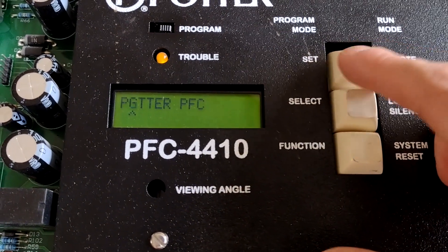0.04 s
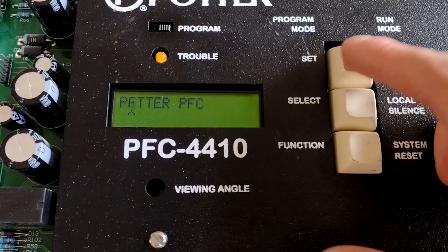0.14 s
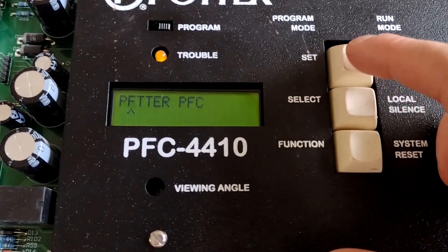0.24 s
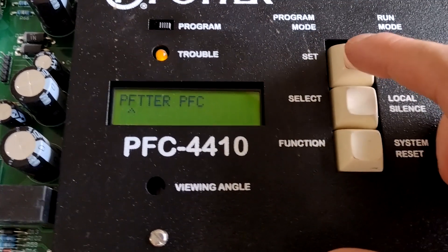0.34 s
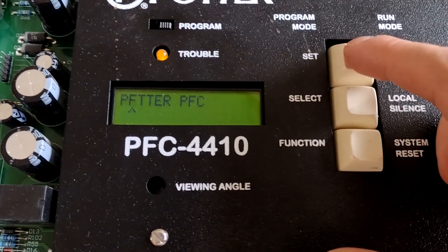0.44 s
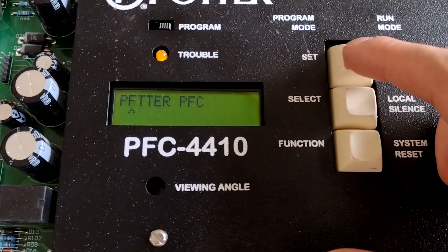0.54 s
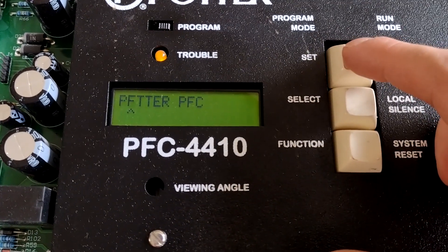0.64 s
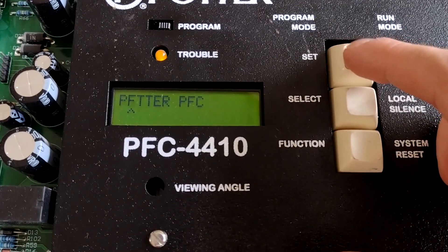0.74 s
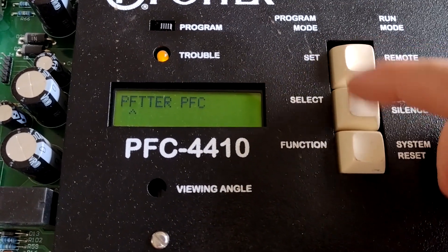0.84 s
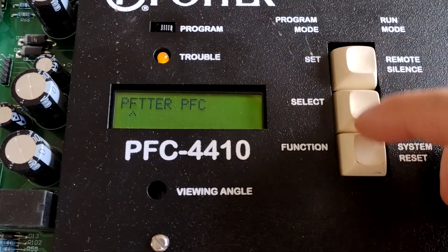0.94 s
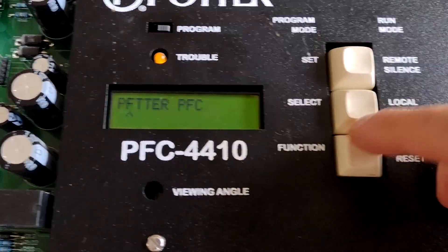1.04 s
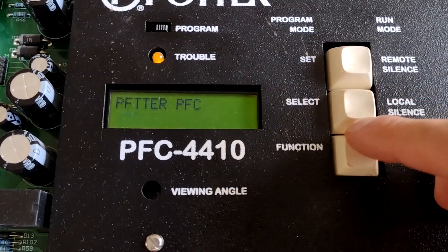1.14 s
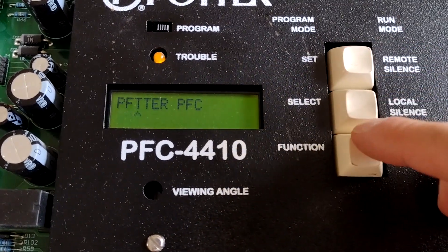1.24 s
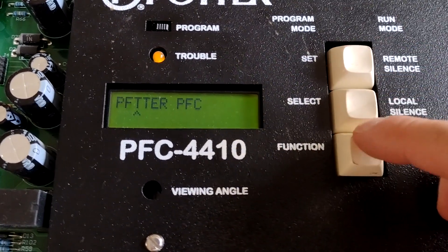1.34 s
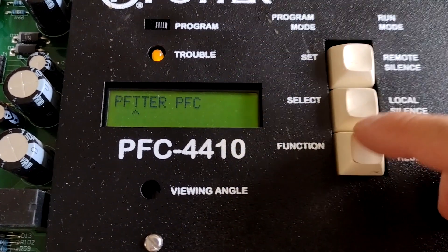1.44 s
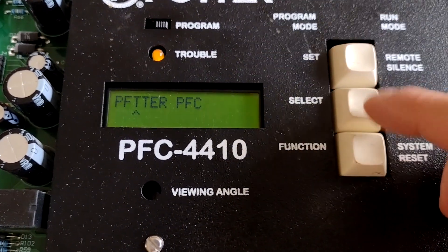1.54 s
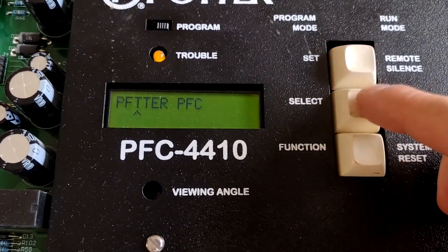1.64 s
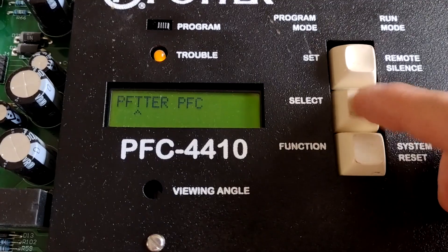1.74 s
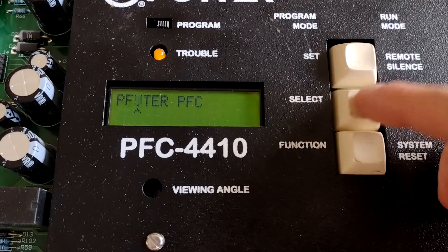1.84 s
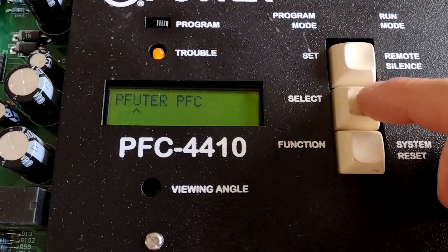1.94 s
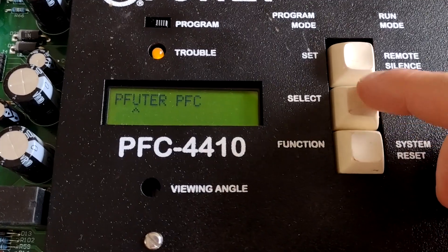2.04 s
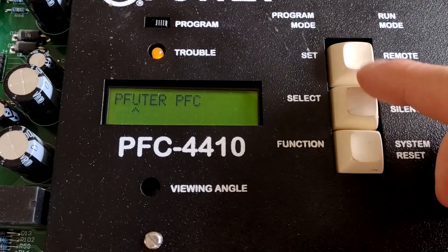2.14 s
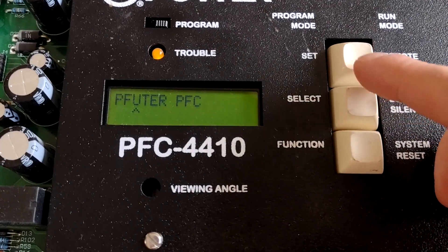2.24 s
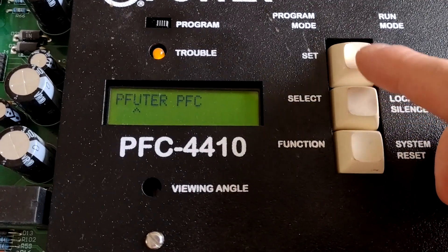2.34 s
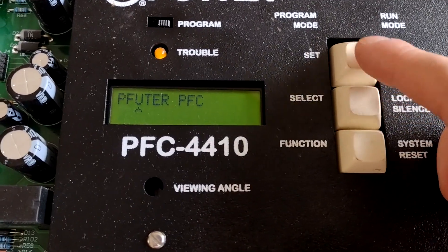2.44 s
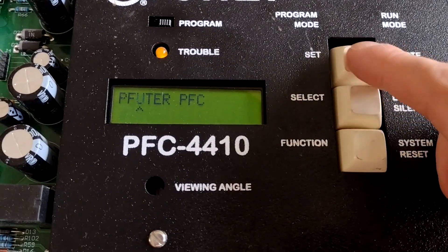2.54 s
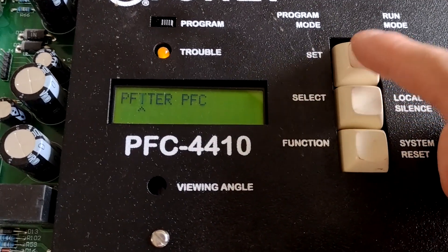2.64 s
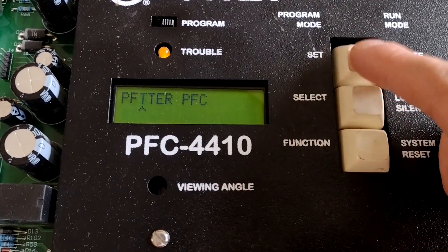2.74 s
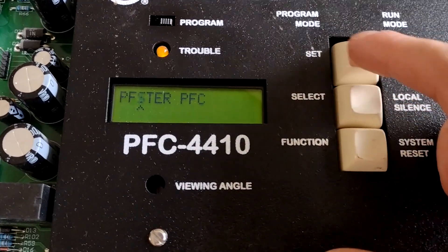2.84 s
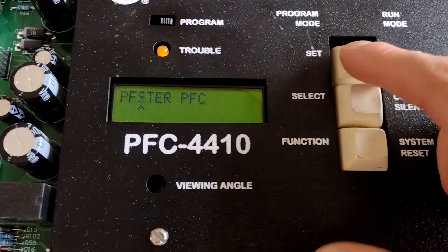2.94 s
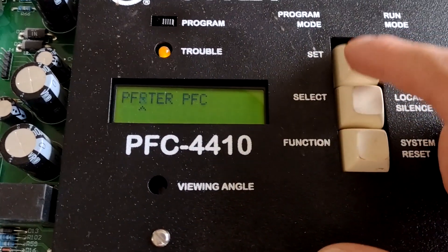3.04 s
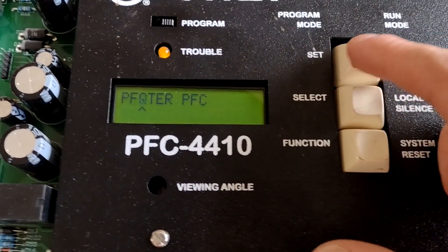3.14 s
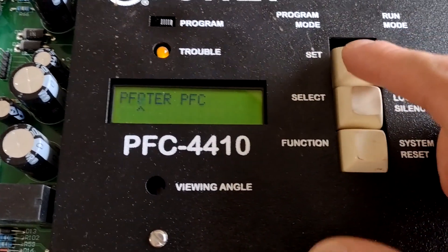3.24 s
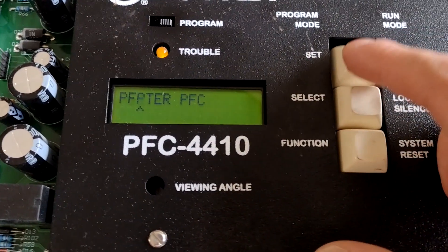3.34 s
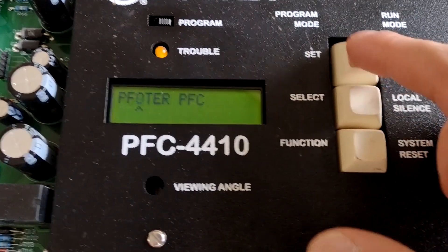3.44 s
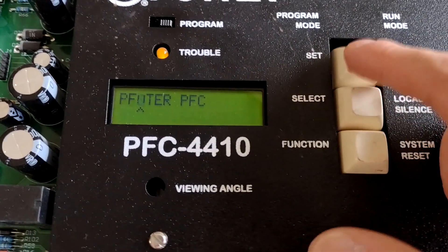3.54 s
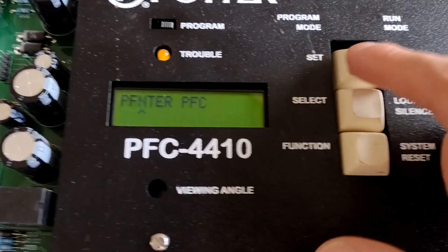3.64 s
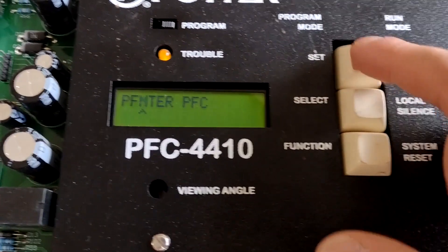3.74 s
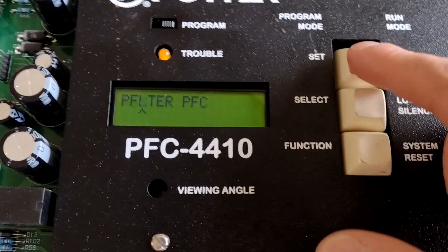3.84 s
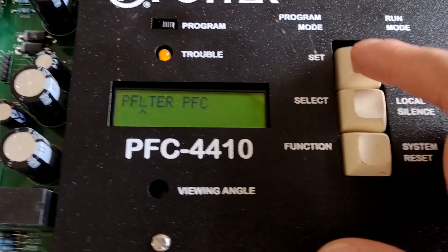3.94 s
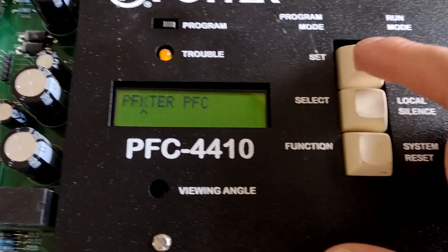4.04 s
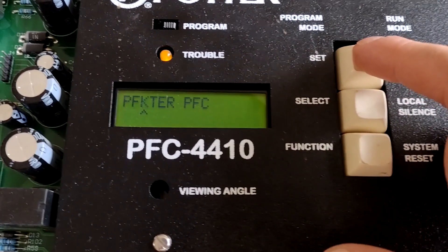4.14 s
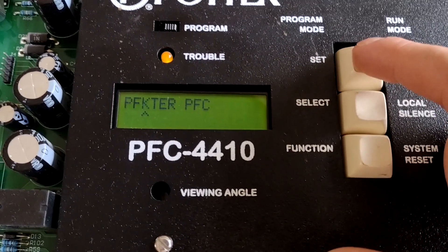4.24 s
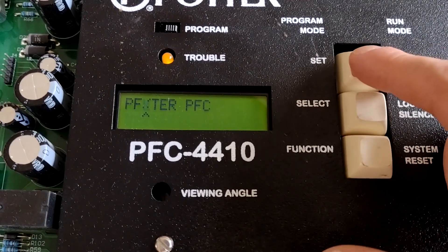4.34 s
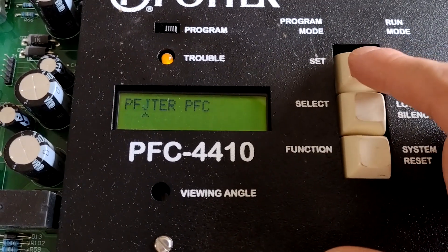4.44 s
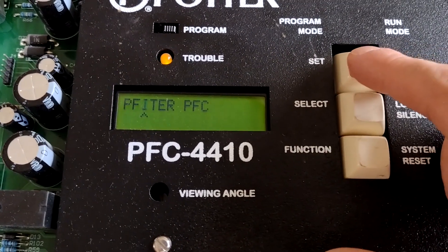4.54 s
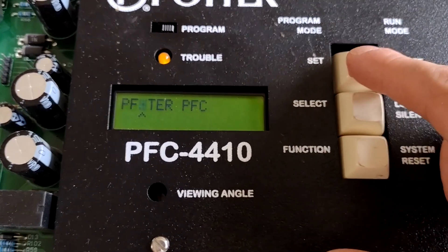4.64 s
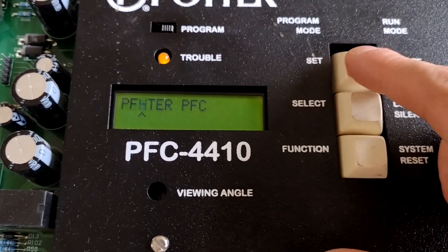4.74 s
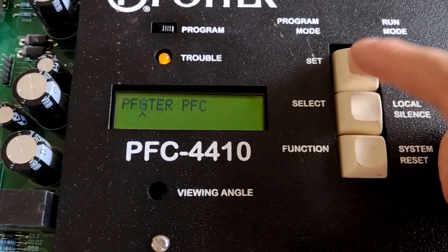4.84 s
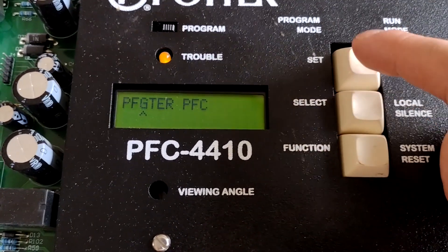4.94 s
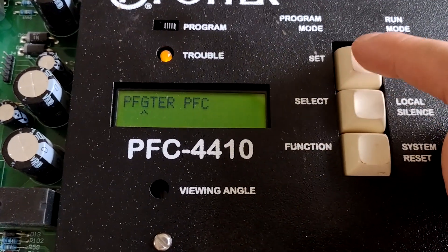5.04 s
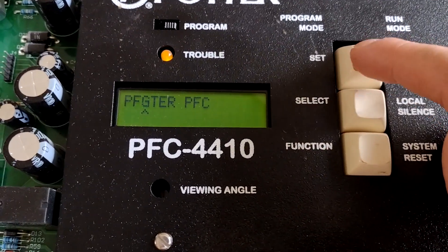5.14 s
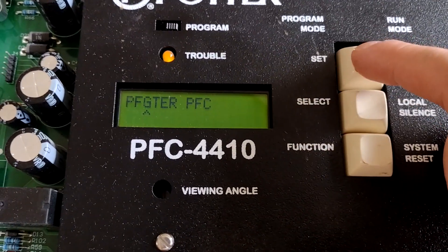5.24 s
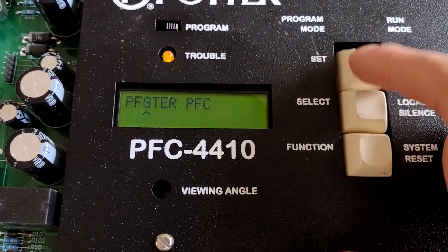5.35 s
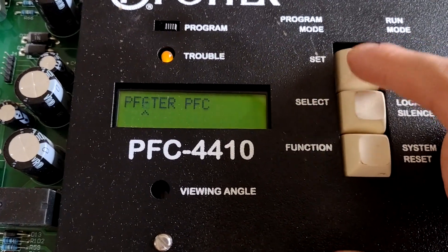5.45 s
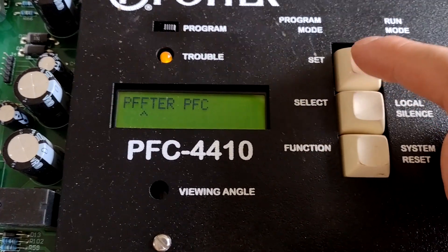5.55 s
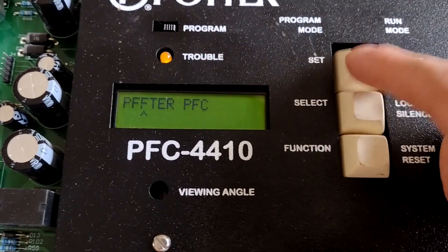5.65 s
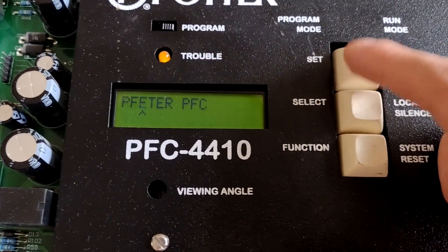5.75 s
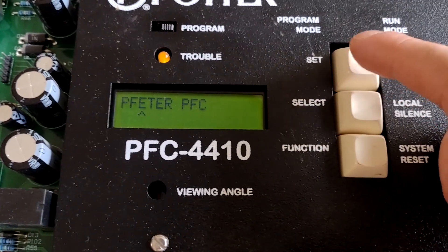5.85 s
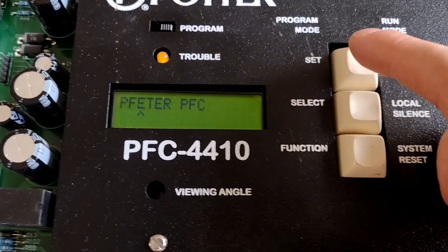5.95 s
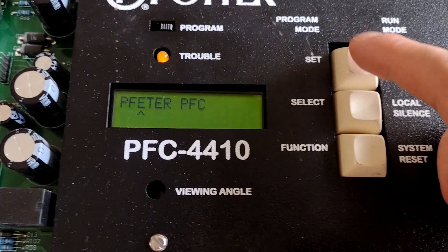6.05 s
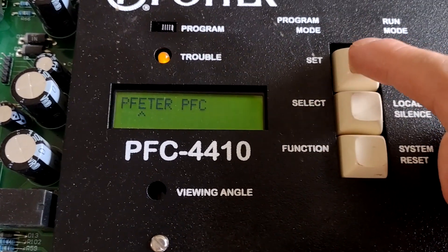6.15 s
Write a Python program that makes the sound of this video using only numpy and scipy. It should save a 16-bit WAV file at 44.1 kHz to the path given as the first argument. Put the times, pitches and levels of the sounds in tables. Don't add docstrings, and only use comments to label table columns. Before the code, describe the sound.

Close stereo phone pickup of push-buttons clicking, slightly left of centre. Each press has a tiny take-up tick, a dry, hard plastic snap with a brief metallic panel ring, and often a small spring-back tick or cap rattle. Presses start sparse, become quick and regular midway, then space out again. Short room reflections, slight handling rumble and barely audible airflow and hum.

```python
import sys
import numpy as np
from scipy import signal
from scipy.fft import rfft, irfft
from scipy.io import wavfile
from scipy.ndimage import uniform_filter1d

SR = 44100
rng = np.random.default_rng(int(sys.argv[2]) if len(sys.argv) > 2 else 0)


def wav_out(sig):
    wavfile.write(sys.argv[1], SR, np.round(np.clip(np.atleast_2d(sig).T, -1, 1) * 32767).astype(np.int16))


def gain_from_db(level_db):
    decades = np.asarray(level_db, float) / 20
    return 10 ** decades


N = 273861

# pitch_hz, level_db, t60_s
CABINET_MODES = [(190, -23, .11), (247, -19, .09), (410, -9, .07), (535, -3, .055), (625, -7, .04),
                 (720, -3, .055), (860, -3, .045), (926, 0, .06)]
PANEL_MODES = [(1175, -4, 0.029), (1369, -2.5, 0.034), (1532, 1.5, 0.037), (1546, -1.5, 0.04),
               (1791, -3.5, 0.072), (2137, 2, 0.038), (2265.5, 1.5, 0.028), (2456, -5.5, 0.03),
               (2702, -21, .022)]
KEY_MODES = [(3100, -16, 0.0026), (3540, -3, 0.0045), (3638, 3.5, .03), (4010, -5.5, 0.021),
             (4410, -2, 0.021), (5150, -7.5, 0.023), (6410, -10, 0.0066), (6570, -14.5, 0.024)]
LEAF_MODES = [(8150, -2, .008), (8930, 1.5, .007), (10450, 2, .006), (11600, -2, 0.0041), (12000, 1, .006),
              (14600, -3.5, 0.0049)]
# frequency_hz, density_db (per Hz)
VENTILATION = [(15, -57.5), (25, -25), (80, -7), (149, -0.5), (363, -12.5), (439, -25), (476, -8.5),
               (516, -14), (911, -19), (1370, -21.5), (1840, -24.5), (12750, -39), (13100, -59.5)]
# pitch_hz, level_db (rms)
HUM_LINES = [(119, -78.5), (241, -79), (362, -86.5), (479, -85.5), (925, -90)]
# centre_hz, t60_s, level_db
ROOM_BANDS = [(286, 0.41, -23.5), (926, 0.19, -18.5), (3000, 0.32, -22), (8600, 0.35, -13)]
# start_s, panel_tilt_db_per_octave, cabinet_db
KEY_PLACES = [
    (0, -3, 3.4),
    (0.95, -15.5, -5),
    (1.65, -16.5, -3.5),
    (2.3, -3.5, 1),
    (4.2, -4, 0.5),
    (5.3, -5, 1),
]
# start_s, panel_peak_db, key_db (re panel), leaf_db (re panel), rattle_ms
SNAPS = [(0.1203, -20, -16.5, -40, 2.9), (0.2281, -20.5, -19, -59, 3.2), (1.059, -29.5, -8.5, -25.5, 3.5),
         (1.8377, -14, -20, -35.5, 1.7), (1.947, -17.5, -17, -33.5, 0.7), (2.606, -26, -29, -45, 2.7),
         (2.701, -20.5, -10, -27.5, 5.8), (2.838, -26, -25, -46, 0.61), (2.9022, -14, -11.5, -34.5, 5.8),
         (2.99, -13, -20.5, -43, 2.2), (3.1378, -18.5, -26.5, -64, 2.7), (3.2715, -16, -26, -62, 0.62),
         (3.4262, -12.5, -21, -42.5, 1.5), (3.5675, -16, -25, -46, 1.8), (3.7129, -20.5, -25, -52, 3.4),
         (3.8607, -16, -21, -41.5, 2.15), (4.023, -29.5, -7.5, -39.5, 2.44), (4.358, -19.5, -18, -51, 3.1),
         (4.928, -25.5, -15.5, -31.5, 1.84), (4.939, -22, -15.5, -41, 4.34), (5.452, -27, -20.5, -39.5, 2),
         (5.5645, -18, -9, -30, 5.1), (5.75, -16.5, -22, -42.5, 0.34), (5.8309, -9.5, -10.5, -27, 3.7)]
# start_s, panel_peak_db, key_db (re panel), rattle_ms
TAKE_UPS = [(0.092, -61, -14.5, 16), (0.1, -47, -15, 3.7), (0.11, -35.5, -5, 2.5),
            (0.188, -34.5, -20.5, 14), (0.204, -43, -21, 9), (0.222, -32, -11, 2.5), (1.036, -44, -10, 4.1),
            (1.817, -58, -2, 7.5), (1.827, -34.5, -17, 2.5), (2.566, -47.5, -14.5, 14),
            (2.596, -55, 3, 2.2), (2.886, -31, -11.5, 14), (4.0, -47.5, 0, 4.9), (4.325, -60.5, -2, 6.5),
            (4.332, -46, -1.5, 7.4), (4.3428, -33.5, -6, 2.8), (4.89, -48, -11.5, 8.8),
            (4.91, -40, -13.5, 21), (5.414, -55, -23, 1.9), (5.423, -51.5, -6, 16),
            (5.525, -45.5, -18, 2.8), (5.547, -44, -8.5, 3.3), (5.559, -34.5, -23, 17),
            (5.732, -40.5, -3.5, 18), (5.822, -32, -9, 1.2), (5.827, -31, -21, 2.6)]
CAP_ROCKS = [(0.246, -38, -13, 3.6), (0.805, -67, -38, 2.7), (1.139, -47.5, -11, 7.6),
             (1.413, -43, -12.5, 4.8), (1.511, -40, -17.5, 10.5), (1.737, -53.5, -27, 1.4),
             (1.887, -38, -32, 1.1), (1.959, -45, -7.5, 0.49), (2.717, -23.5, -11, 2.5),
             (2.791, -41, -13.5, 1.1), (2.803, -43, -8.5, 2.1), (2.97, -39.5, -5, 9.4),
             (3.047, -26, -16, 4.4), (3.075, -31.5, -22.5, 4.9), (3.245, -33.5, -12, 4),
             (3.368, -28.5, -20, 0.95), (3.389, -39, -8.5, 9.2), (3.495, -28, -17.5, 1.3),
             (3.529, -35.5, -7.5, 9.2), (3.695, -32, -10.5, 2.5), (3.823, -31.5, -12.5, 1.7),
             (4.187, -52.5, -17, 3.5)]
LEAF_RELEASES = [(0.992, -81, -21, 3), (1.245, -49, -8.5, 9.8), (1.72, -62, -21, 1.8),
                 (3.111, -37.5, -6, 5.2), (3.199, -33, -23.5, 12.5), (3.257, -43.5, -2.5, 3.8),
                 (3.333, -31.5, -16.5, 4.1), (3.483, -32.5, -6.5, 1), (3.622, -32, -14, 8.5),
                 (3.685, -32.5, -14, 5.4), (3.782, -35, -14.5, 2.6)]
# start_s, end_s, scrape_db
STEM_SLIDES = [(0.134, 0.267, -64), (0.81, 0.87, -81), (1.013, 1.04, -72), (1.093, 1.29, -69.5),
               (1.397, 1.78, -78.5), (1.888, 1.93, -57.5), (2.633, 2.69, -54.5), (2.7, 2.796, -48),
               (2.908, 2.97, -44), (3.036, 3.12, -48), (3.195, 3.26, -51), (3.348, 3.41, -52),
               (3.455, 3.55, -49.5), (3.615, 3.7, -52), (3.808, 3.89, -49), (4.308, 4.42, -72),
               (4.9, 5.001, -77.5), (5.436, 5.505, -70), (5.563, 5.63, -47.5), (5.668, 5.75, -80),
               (5.816, 5.921, -47)]


def contacts():
    middling_panel_db, middling_key_db = -30, -15

    def cabinet_change(panel_db, key_db):
        return -0.17 * (panel_db - middling_panel_db) + 0.36 * (key_db - middling_key_db)

    def leaf_change(panel_db, key_db):
        return -0.032 * (panel_db - middling_panel_db) + 0.27 * (key_db - middling_key_db)

    events = []
    for start_s, panel_db, key_db, leaf_db, rattle_ms in SNAPS:
        cabinet_db = -9 + cabinet_change(panel_db, key_db)
        events.append((start_s, panel_db, cabinet_db, key_db, leaf_db, rattle_ms, 0))
    small_kinds = ((TAKE_UPS, -11.5, -31, 2.2), (CAP_ROCKS, -5.5, -37, 9), (LEAF_RELEASES, -6, -27, 7))
    for rows, base_cabinet_db, base_leaf_db, tilt_db in small_kinds:
        for start_s, panel_db, key_db, rattle_ms in rows:
            cabinet_db = base_cabinet_db + cabinet_change(panel_db, key_db)
            leaf_db = base_leaf_db + leaf_change(panel_db, key_db)
            events.append((start_s, panel_db, cabinet_db, key_db, leaf_db, rattle_ms, tilt_db))
    return events


def ring(modes, scatter_db, detune, spread_rad, tilt_db=0, cycles=60):
    hz, db, t60 = np.repeat(modes, 3, axis=0).T
    t60 = np.minimum(t60, cycles / hz)
    t = np.arange(int(t60.max() * SR)) / SR
    level_luck, pitch_luck, phase_luck = rng.standard_normal((len(hz), 3)).T
    size = gain_from_db(db + tilt_db * np.log2(hz / 1500) + scatter_db * level_luck)
    sense = np.repeat((-1) ** np.arange(len(modes)), 3)
    size *= np.where(hz < 1000, sense, 1)
    pole = 2j * np.pi * hz * (1 + detune * pitch_luck) - np.log(1000) / t60
    lead = np.minimum(np.pi * hz * .00004, .6) + spread_rad * phase_luck
    port_gains = size * np.exp(1j * np.outer([1, -1], lead))
    pair = np.imag(port_gains @ np.exp(np.outer(pole, t).astype(np.complex64)))
    return pair * (1 - np.exp(-hz.mean() * t / 0.61)) ** 2


def band(x, lo_hz, hi_hz):
    return signal.sosfilt(signal.butter(2, [lo_hz, min(hi_hz, .45 * SR)], "band", fs=SR, output="sos"), x)


def own_range(x, modes):
    lo_hz, hi_hz = 0.53 * modes[0][0], 1.5 * modes[-1][0]
    return band(band(x, lo_hz, hi_hz), lo_hz, hi_hz)


def knocks():
    parts = ((PANEL_MODES, .02, .7, .035), (CABINET_MODES, .012, .22, .05),
             (KEY_MODES, .022, .8, .12), (LEAF_MODES, .06, .8, .3))
    near_parts, pushes = np.zeros((4, 2, N + SR)), np.zeros((4, N + SR))
    t = np.arange(2048) / SR
    early = int(.012 * SR)
    for start_s, panel_db, cabinet_db, key_db, leaf_db, rattle_ms, kind_tilt_db in contacts():
        age = t / (np.clip(rattle_ms, .2, 15) / 1000)
        rattle = rng.standard_normal(len(t)) ** 3 * age * np.exp(-1.1 * age)
        place_tilt_db, frame_db = [row[1:] for row in KEY_PLACES if row[0] <= start_s][-1]
        start = int(start_s * SR)
        shares_db = (0, cabinet_db + frame_db, key_db, leaf_db)
        for k, (modes, detune, spread_rad, looseness) in enumerate(parts):
            push = looseness * rattle
            push[0] = 1
            tilt_db = kind_tilt_db + place_tilt_db if k == 0 else 0
            body = ring(modes, 3.0, detune, spread_rad, tilt_db)
            sound = signal.fftconvolve(body, push[None], axes=1)
            mid = sound.mean(axis=0)[:early]
            if k == 0:
                panel_rms = gain_from_db(panel_db) * mid.std() / np.abs(mid).max()
            sound *= panel_rms * gain_from_db(shares_db[k]) / mid.std()
            near_parts[k, :, start:start + sound.shape[1]] += sound
            pushes[k, start] += np.sqrt(np.sum(sound ** 2) / 2)
    near, far = 0, 0
    for k, (modes, detune, _, _) in enumerate(parts):
        near = near + own_range(near_parts[k], modes)
        blur = ring(modes, 0, detune, 0, -6 if k == 0 else 0, cycles=14)[0]
        spread_sound = signal.fftconvolve(pushes[k], blur / np.linalg.norm(blur))[:N]
        far = far + own_range(spread_sound, modes)
    return near[:, :N], far


def load():
    rise_db_per_s, fall_db_per_s = 350.5, 196
    t = np.arange(0, N / SR + .002, .002)
    pressure = 0
    for start_s, end_s, db in STEM_SLIDES:
        before, after = np.maximum(start_s - t, 0), np.maximum(t - end_s, 0)
        pressure = pressure + gain_from_db(db - rise_db_per_s * before - fall_db_per_s * after)
    return np.interp(np.arange(N) / SR, t, pressure)


def scrapes():
    slips = rng.standard_normal(N) * gain_from_db(2.5 * rng.exponential(size=N))
    slips *= gain_from_db(3.9 * np.repeat(rng.standard_normal(N // 256 + 1), 256)[:N])
    gain = load()
    # modes, level_db, tilt_db_per_octave
    parts = ((PANEL_MODES, 0, -5.0), (CABINET_MODES, -6, 0), (KEY_MODES, -18, 0), (LEAF_MODES, -38, 0))
    drive = (gain * slips / slips.std())[None]
    out = 0
    for modes, db, tilt_db in parts:
        body = own_range(ring(modes, 1.4, 0.021, 1.0, tilt_db, cycles=150), modes)
        body = body / np.sqrt(np.sum(body ** 2) / 2)
        out = out + gain_from_db(db) * signal.fftconvolve(body, drive, axes=1)[:, :N]
    return out


def handling(keys):
    effort = uniform_filter1d(np.abs(keys.mean(axis=0)), 4096)
    mid, side = band(rng.standard_normal((2, N)), 58, 210)
    return gain_from_db(-33.5) * effort ** 0.75 * (mid + .35 * side * np.array([[1], [-1]])) / mid.std()


def room(x):
    t = np.arange(SR // 2) / SR
    tail = 0
    for hz, t60, db in ROOM_BANDS:
        mid, side = band(rng.standard_normal((2, len(t))), hz / 1.8, hz * 1.8)
        shape = gain_from_db(-60 * t / t60) * (1 - np.exp(-t / 0.004))
        pair = shape * (mid + min(hz / 2500, 1) * side * np.array([[1], [-1]]))
        tail = tail + gain_from_db(db) * pair / np.sqrt(np.sum((shape * mid) ** 2))
    return signal.fftconvolve(tail, x.mean(axis=0)[None], axes=1)[:, :N]


def air():
    hz = np.fft.rfftfreq(N, 1 / SR) + 1
    point_hz, point_db = np.transpose(VENTILATION)
    colour = gain_from_db(np.interp(np.log(hz), np.log(point_hz), point_db))
    mid, side = rfft(rng.standard_normal((2, N))) * colour
    width = np.clip(0.4 + hz / 3000, 0, 1)
    noise = irfft(mid + width * side * np.array([[1], [-1]]), N)
    noise *= gain_from_db(-69.5) / noise.mean(axis=0).std()
    for line_hz, db in HUM_LINES:
        drift_rad = np.cumsum(rng.standard_normal(N)) * 0.017
        noise += np.sqrt(2) * gain_from_db(db) * np.sin(2 * np.pi * line_hz * np.arange(N) / SR + drift_rad)
    return noise


def scene():
    near, far = knocks()
    slide = scrapes()
    keys = gain_from_db(0.68) * near + slide
    walls = room(far + 0.57 * near + slide)
    lean_db = 2.5
    lean = gain_from_db(np.array([[lean_db], [-lean_db]]) / 2)
    return (keys + walls) * lean + handling(keys) + air()


def band_limit(x):
    return signal.sosfilt(signal.butter(12, 16450, fs=SR, output="sos"), x)


def record(dry):
    mix = signal.sosfilt(signal.butter(14, 16000, fs=SR, output="sos"), dry)
    return band_limit(mix)


dry = scene()
out = record(dry)
wav_out(out)
```